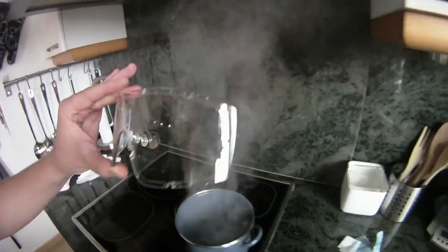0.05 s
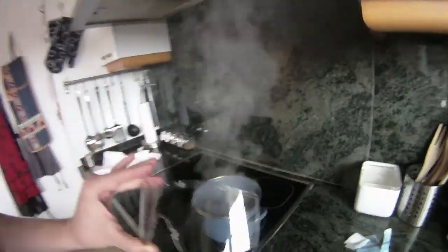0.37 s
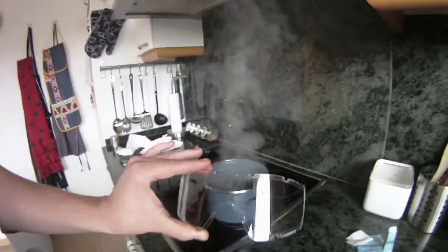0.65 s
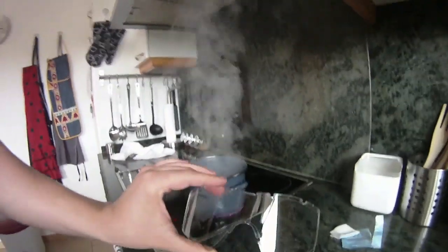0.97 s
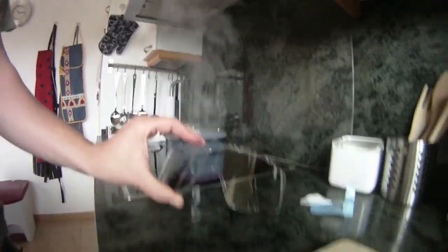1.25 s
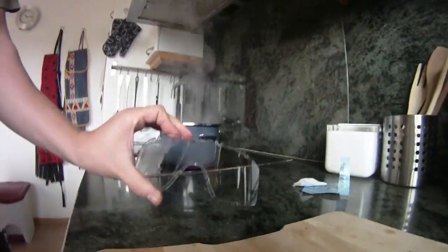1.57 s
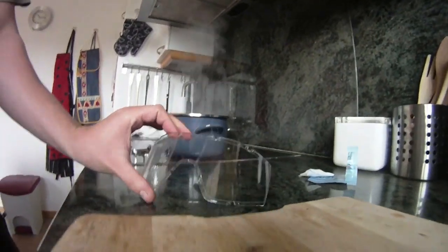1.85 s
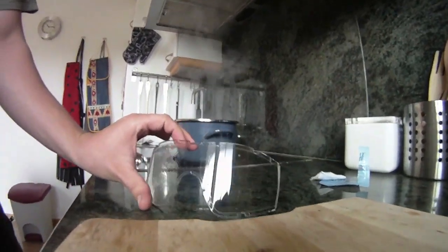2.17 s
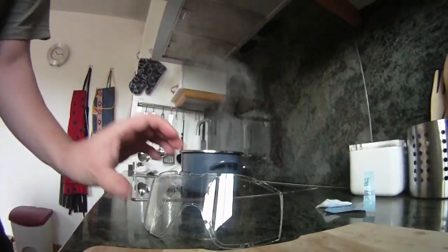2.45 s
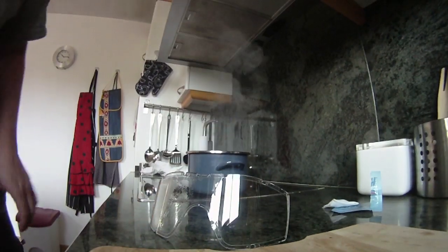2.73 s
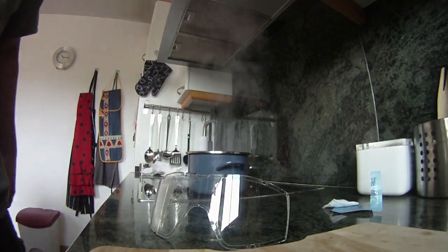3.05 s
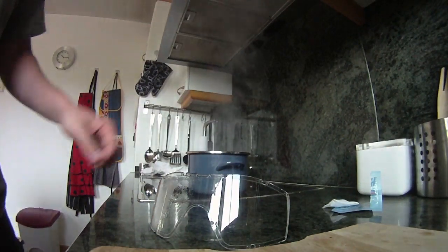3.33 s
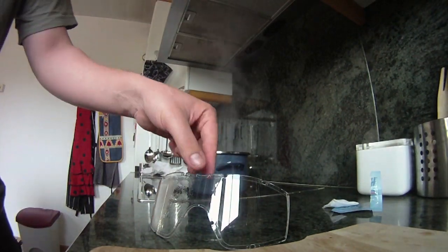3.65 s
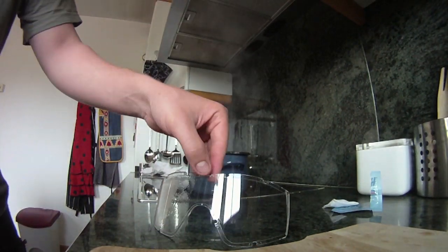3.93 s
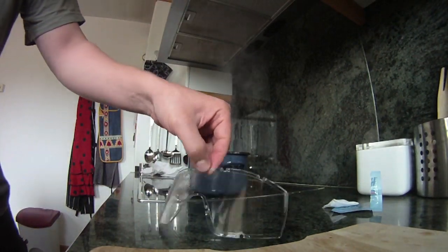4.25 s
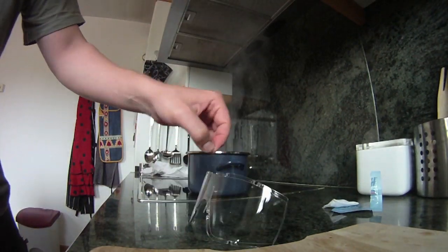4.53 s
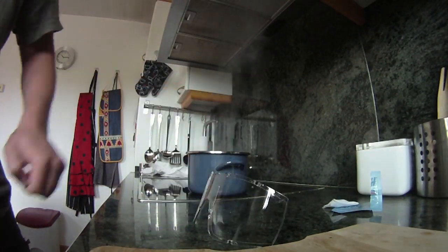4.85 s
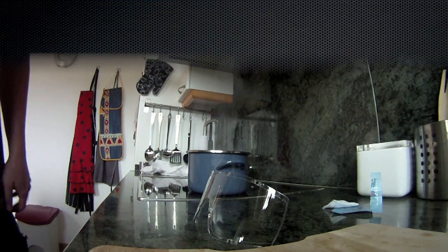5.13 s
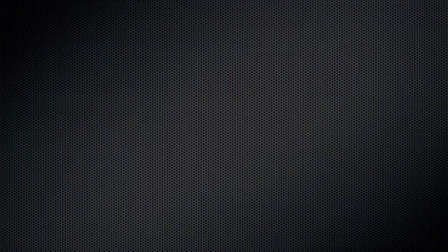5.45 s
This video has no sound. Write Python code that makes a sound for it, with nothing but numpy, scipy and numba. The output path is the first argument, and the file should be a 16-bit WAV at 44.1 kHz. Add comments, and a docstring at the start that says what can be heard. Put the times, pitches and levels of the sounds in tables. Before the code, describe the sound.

In a kitchen, a hob hums low and a steaming pot hisses faintly. The microphone clicks, knocks and scrapes as it is carried. Plastic safety goggles are set on a stone worktop with a ringing chatter, then the microphone lands with a loud, overloaded thump. Later the goggles tip over and chatter again. A few small knocks and a pop end it, all with a slightly glassy treble.

```python
"""A hob hums and a pot steams while a camera, carried close by, scrapes, clicks and knocks in its case.
The plastic shield of some safety goggles is set down on a stone worktop, where it rings and chatters.
The camera is put down with a thump that overloads its microphone; later the shield tips over and
chatters again. The camera samples the sound slowly, which adds a glassy treble."""
import sys
import numpy as np
from scipy import signal
from scipy.fft import rfft, irfft
from scipy.io import wavfile
from scipy.ndimage import uniform_filter1d
from numba import njit

SR = 44100
rng = np.random.default_rng(int(sys.argv[2]) if len(sys.argv) > 2 else 0)


def wav_record(signal):
    """Record a signal, one row per channel, as 16-bit PCM in the file named by sys.argv[1]."""
    frames = np.transpose(np.atleast_2d(signal))
    bounded = np.clip(frames, -1, 1)
    # unit amplitude maps onto the largest positive 16-bit level
    quanta = np.round(bounded * 32767).astype(np.int16)
    wavfile.write(sys.argv[1], SR, quanta)


N = 246519
T = np.arange(N) / SR

# the tone of the plastic case when it clicks or rubs: (frequency [Hz], level [dB])
CASE_COLOUR = [(150, -22), (400, -5), (900, 2.5), (1600, -3), (3000, 4), (4700, -4), (6000, -8.5)]


def undb(db):
    """Turn decibels into a gain to multiply by."""
    return 10 ** (np.asarray(db) / 20)


def unit(x):
    """Scale a sound to an average (rms) level of 1."""
    return x / np.sqrt(np.mean(x ** 2))


def unit_hit(x):
    """Scale a hit to the energy of 4 ms of sound at level 1."""
    return x / np.sqrt(np.sum(x ** 2) / (.004 * SR))


def fade(t60, size):
    """A gain, size samples long, that dies away by 60 dB every t60 seconds."""
    return np.exp(-np.log(1000) * T[:size] / t60)


def ping(hz, t60, size):
    """One pure note that dies away."""
    return fade(t60, size) * np.sin(2 * np.pi * hz * T[:size])


def tone(hz, db):
    """A lasting note that follows a changing pitch, at an average level of db."""
    phase = 2 * np.pi * np.cumsum(hz) / SR
    return np.sqrt(2) * undb(db) * np.sin(phase)


def add(out, s, x):
    """Mix x into out, starting at s seconds."""
    i = int(s * SR)
    out[i:i + len(x)] += x[:N - i]


def after(s, ramp_s=0.082):
    """Slide from 0 to 1 around s seconds."""
    return np.clip((T - s) / ramp_s + .5, 0, 1)


def swell(rows, range_db=25.5):
    """A gain that climbs range_db to each peak in its rise time and sinks as far in its fall time."""
    gain = np.zeros(N)
    for peak_s, db, rise_s, fall_s in rows:
        distance = np.maximum((peak_s - T) / rise_s, (T - peak_s) / fall_s)
        gain += undb(db - range_db * np.minimum(distance, 10))
    return gain


def colour(x, points, tilt_db=0, size=2048):
    """Shape the tone along (Hz, dB) points; tilt_db per octave makes it brighter or duller."""
    hz, db = np.transpose(points)
    point_octaves = np.log2(hz)
    octave = np.log2(np.maximum(np.arange(size // 2 + 1) * SR / size, 1))
    slope_db = tilt_db * (np.maximum(octave, point_octaves[0]) - point_octaves.mean())
    top_cut_db = -40 * np.clip(octave - point_octaves[-1], 0, 1)
    gain = undb(np.interp(octave, point_octaves, db) + slope_db + top_cut_db)
    # build the filter so that it rings only after a hit, never before
    cepstrum = irfft(np.log(gain))
    cepstrum[1:size // 2] *= 2
    cepstrum[size // 2 + 1:] = 0
    response = irfft(np.exp(rfft(cepstrum))) * np.hanning(2 * size)[size:]
    return signal.fftconvolve(x, response)[:len(x)]


def drift(rate):
    """A smooth random wander of about 1 either way, with rate new values a second."""
    hold = int(SR / rate)
    steps = np.repeat(rng.standard_normal(N // hold + 1), hold)
    return unit(uniform_filter1d(uniform_filter1d(steps, hold), hold)[:N])


def specks(rate, scatter_db):
    """Tiny random kicks of uneven size, about rate of them a second."""
    kicks = (rng.random(N) < rate / SR) * rng.choice([-1, 1], N)
    return unit(kicks * undb(scatter_db * rng.standard_normal(N)))


def room(x, echo_db, t60=0.42, build_s=0.0027, size=30000):
    """Hard kitchen walls throw back a wash of echoes within a few milliseconds."""
    tail = rng.standard_normal(size) * fade(t60, size) * (1 - np.exp(-T[:size] / build_s))
    tail /= np.sqrt(np.sum(tail ** 2))
    return x + undb(echo_db) * signal.fftconvolve(x, tail)[:N]


def drones():
    """Weak, wavering notes fill the kitchen; one more sounds only for about the first second."""
    # the lasting notes: (pitch [Hz], level [dB])
    notes = [(43, -57.5), (92, -44), (142, -50), (361, -62), (689, -62.5)]
    lasting = sum(tone(hz + 2.282 * drift(6), db + 1.5 * drift(4.9)) for hz, db in notes)
    early = tone(hz=320 + 3 * drift(13.3), db=-53.5) * (after(0.163) - after(1.1))
    return lasting + early


def steam():
    """A pot of water hisses: thousands of tiny pops a second blur together."""
    # the hiss, which drops as the pot is left behind: (time [s], level [dB])
    levels = [(0, -52), (1.95, -50), (2.7, -55.5), (5.3, -53)]
    # the tone of the hiss: (frequency [Hz], level [dB])
    hiss_colour = [(300, 6.5), (700, -6), (1300, 3), (2200, 2.5), (3000, 5), (4500, -8), (6000, 1)]
    hiss = unit(colour(specks(rate=7000, scatter_db=4.5), hiss_colour))
    return hiss * undb(np.interp(T, *np.transpose(levels)) + 0.3 * drift(3.3))


def rumble(hum_db, level_db=-39, follow_share=0.095):
    """The room rumbles, rising and falling a little with the hob's hum."""
    # deep noise with a faint hiss on top: (frequency [Hz], level [dB])
    rumble_colour = [(20, -13), (45, 5), (70, -6.5), (105, -4.5), (145, 0.5), (180, -13), (230, -18.5),
                     (320, -17), (460, -15), (690, -12.5), (1000, -29.5), (2800, -40), (6000, -46.5)]
    noise = unit(colour(rng.standard_normal(N), rumble_colour, size=16384))
    return noise * undb(level_db + follow_share * (hum_db - hum_db.mean()))


def worktop():
    """The worktop booms softly under the hands."""
    # each boom: (peak time [s], level [dB], rise [s], fall [s])
    booms = [(2.06, -29, 0.21, 0.28), (4.15, -33, 0.25, 0.62), (5.09, -35.5, 0.23, 0.58)]
    # the worktop's deep tone: (frequency [Hz], level [dB])
    boom_colour = [(20, -24), (40, 6.5), (70, 1.5), (110, -16.5), (300, -27.5), (1000, -74.5)]
    return unit(colour(rng.standard_normal(N), boom_colour, size=16384)) * swell(booms)


def kitchen(hum_hz=121.2, rise_hz_per_s=.38, waver_db=1.8, hush_s=5.39, hush_db=-7):
    """The hob hums among the other background sounds; all of them sink just before the end."""
    # the hob's hum: (time [s], level [dB])
    hum_levels = [(0, -59), (.6, -42.5), (1.6, -35.5), (2.6, -37), (3.7, -34), (4.4, -37), (5.3, -41.5)]
    hum_db = np.interp(T, *np.transpose(hum_levels))
    hum = tone(hum_hz + rise_hz_per_s * T, hum_db + waver_db * drift(10))
    background = hum + drones() + steam() + rumble(hum_db) + worktop()
    return background * undb(hush_db * after(hush_s))


def crackle(start_s=1.38, end_s=1.66, level_db=-55.5):
    """A few dry ticks, then a thin, high crackle while the shield is carried."""
    # the single ticks: (time [s], level [dB])
    ticks = [(1.0216, -47), (1.2782, -47), (1.322, -47), (1.3393, -45), (1.356, -49)]
    tick = ping(hz=4750, t60=.004, size=512)
    out = unit(signal.fftconvolve(specks(rate=890, scatter_db=1.5), tick)[:N])
    out *= undb(level_db) * (after(start_s) - after(end_s))
    for s, db in ticks:
        add(out, s, undb(db) * unit_hit(tick))
    return out


def case_scrapes():
    """The camera case scrapes: many tiny slips follow each other too fast to tell apart."""
    # rubs on fingers and stone: (peak time [s], level [dB], rise [s], fall [s])
    rubs = [(.165, -27.5, 0.031, 0.019), (.78, -47.5, 0.47, .1), (.905, -34, 0.016, 0.0076),
            (1.086, -40.5, 0.062, 0.011), (1.22, -39, 0.14, 0.0099), (2.5, -33, 0.0034, 0.045),
            (2.544, -20.5, 0.029, 0.017), (5.045, -35.5, .018, 0.11), (5.18, -42.5, 0.12, 0.058)]
    # light scuffs as the hand leaves: (peak time [s], level [dB], rise [s], fall [s])
    scuffs = [(2.763, -29.5, .002, 0.011), (2.792, -33, 0.027, 0.036), (2.83, -43.5, 0.065, 0.17)]
    # the bright tone of a scuff: (frequency [Hz], level [dB])
    scuff_colour = [(500, 0), (1800, -4), (3400, 8.5), (4800, 7), (6000, 3)]
    rub = unit(colour(specks(rate=1700, scatter_db=2.5), CASE_COLOUR))
    scuff = unit(colour(specks(rate=8300, scatter_db=5.5), scuff_colour))
    return rub * swell(rubs) + scuff * swell(scuffs)


def case_clicks(t60=0.017, ring_db=-5, size=4096):
    """The plastic case snaps in its joints: a short crack of noise with a note of its own."""
    # each snap: (time [s], level [dB], brightness [dB per octave], pitch [Hz])
    snaps = [(0.158, -23, -3.5, 1050), (0.4596, -13, -2, 4570), (0.9052, -28, -5, 2860),
             (0.9861, -18.5, -1.5, 2280), (1.0872, -14.5, 5, 3920), (1.103, -25, -5, 3540),
             (1.4026, -25, 4.5, 2840), (2.4205, -1, -5.5, 1655), (2.497, -24.5, -6, 1130),
             (2.5446, -11.5, -1.5, 2620), (5.03, -35, 2.5, 2470), (5.0771, -17.5, -0.5, 1046),
             (5.2838, -36.5, -5, 1160), (5.33, -31, -8, 1120), (5.3447, -29, -5, 2260),
             (5.3774, -37, -8, 2560)]
    out = np.zeros(N)
    for s, db, tilt_db, hz in snaps:
        burst = rng.standard_normal(size) * fade(t60, size)
        crack = unit_hit(colour(burst, CASE_COLOUR, tilt_db))
        ring = unit_hit(ping(hz, t60, size))
        add(out, s, undb(db) * unit_hit(crack + undb(ring_db) * ring))
    return out


def case_knocks(thud_cycles=0.52, wall_rise_s=0.0015, resting_from_s=3, size=6000):
    """A fingertip or the stone bumps the case: a few heavy swings, then its wall rings on."""
    # each bump: (time [s], strength [dB], thud pitch [Hz], gain of the wall's ring [dB])
    bumps = [(0.4602, -7.5, 755, -15.5), (0.904, -28.5, 617, -18), (1.0875, -8.5, 812, -25),
             (1.4035, -15.5, 780, -15.5), (1.877, -37.5, 590, -22), (2.012, -32.5, 636, 4),
             (2.122, -22.5, 610, -7), (2.219, -27.5, 597, -3), (2.374, -25, 950, -7), (2.42, 17, 545, -60),
             (2.4965, -25.5, 623, -4), (2.545, -30, 600, -7), (4.335, -13.5, 720, 1.5),
             (5.171, -21.5, 525, -2.5), (5.183, -19, 199, -44), (5.214, -40, 616, 0),
             (5.328, -28.5, 567, 2)]
    # how the hollow case boosts or weakens the bumps: (frequency [Hz], gain [dB])
    hollow_colour = [(100, -8.5), (320, -13.5), (470, 1.5), (680, 3), (830, -8), (1000, 5.5), (1250, 1),
                     (1450, -31), (2000, -3)]
    held, resting = (592, 0.1), (655, 0.065)  # the wall, in the hand and free: (pitch [Hz], ring [s])
    out, t = np.zeros(N), T[:size]
    for s, db, hz, ring_db in bumps:
        wall_hz, wall_t60 = held if s < resting_from_s else resting
        thud_shape = t ** 3 * np.exp(-np.sqrt(2) * hz * t / thud_cycles)
        thud = unit_hit(thud_shape * np.sin(2 * np.pi * hz * t))
        wall = 2 * (1 - np.exp(-t / wall_rise_s)) * ping(wall_hz, wall_t60, size)
        add(out, s, undb(db) * (thud + undb(ring_db) * wall))
    return colour(out, hollow_colour)


def shield_ring(ring_t60, blur_t60, blur_db, tilt_db, size=12000):
    """The shield hits stone and rings with many notes; each spot on the rim mixes them differently."""
    # the shield's clear notes: (pitch [Hz], relative level [dB])
    notes = [(500.6, -39), (683.7, -42), (909.8, -47), (1195, -39.5), (1626, -50), (1857, -46), (2011, -43),
             (2155, -36.5), (2261, -38), (2406, -40), (2552, -44), (2589, -40), (2869, -45), (3149, -50),
             (3219, -50), (3747, -43), (3854, -40), (3946, -37.5)]
    # its crowded notes, which blur into noise: (frequency [Hz], relative level [dB])
    blur_colour = [(100, -32), (320, -5), (480, 1.5), (700, 7), (940, -2.5), (1170, 1), (1450, -4),
                   (1700, -2.5), (2150, -3.5), (2900, 0.5), (3400, -5.5), (3950, -3), (4250, -18.5),
                   (5000, -11.5)]
    hz, db = np.transpose(notes)[:, :, None]
    gains = undb(db + tilt_db * np.log2(hz) + 2 * rng.standard_normal(hz.shape))
    waves = np.sin(2 * np.pi * (hz * T[:size] + rng.random(hz.shape)))
    clear = (gains * waves).sum(0) * fade(ring_t60, size)
    blur = colour(rng.standard_normal(size) * fade(blur_t60, size), blur_colour)
    return unit_hit(unit_hit(clear) + undb(blur_db) * unit_hit(blur))


def shield_taps(boost_db=3):
    """Hard taps on the stone make the whole shield ring; soft fingertips wake just one note."""
    # taps on the stone: (time [s], level before the boost [dB], brightness [dB per octave])
    taps = [(1.671, -19, 3), (1.991, -26, 9), (2.007, -18, -8.5), (2.1238, -18, -12.5), (2.134, -18.5, -25),
            (2.214, -17.5, 1), (2.25, -20.5, -10), (2.3721, -23.5, 7), (3.999, -39, -9), (4.187, -28, -5),
            (4.3223, -20, 0.5), (4.3346, -9, 3.5), (4.355, -20, 15.5), (4.4008, -15, 9), (4.432, -13.5, -1),
            (4.486, -18, 3.5)]
    # fingertip touches: (time [s], level [dB])
    touches = [(3.748, -47), (3.853, -39.5), (3.999, -44.5), (4.034, -30), (4.188, -36)]
    out = np.zeros(N)
    for s, db, tilt_db in taps:
        ring = shield_ring(ring_t60=0.087, blur_t60=0.035, blur_db=0, tilt_db=tilt_db)
        add(out, s, undb(db + boost_db) * ring)
    for s, db in touches:
        add(out, s, undb(db) * unit_hit(ping(hz=1190, t60=0.068, size=8000)))
    return out


def shield_chatter(rim_spots=4, settle_db=20.5):
    """The shield bounces at random on several spots of its rim, and the bounces shrink as it settles."""
    # each spell of chatter: (start [s], time to sink by settle_db [s], starting level [dB])
    spells = [(1.989, 0.064, -26), (2.067, 0.26, -37.5), (2.121, 0.25, -19.5), (2.389, 0.031, -35),
              (4.0, 0.051, -41.5), (4.328, 0.28, -18.5)]
    force, out = np.zeros(N), np.zeros(N)
    for s, length, db in spells:
        progress = np.clip((T - s) / length, 0, 2)
        force += (T >= s) * undb(db - settle_db * progress ** 2)
    for _ in range(rim_spots):
        ring = shield_ring(ring_t60=.17, blur_t60=0.051, blur_db=-0.5, tilt_db=-0.9)
        ring /= np.sqrt(rim_spots * np.sum(ring ** 2))
        bounces = force * specks(rate=80, scatter_db=1.5)
        out += signal.fftconvolve(bounces, ring)[:N]
    return out


def scene():
    """One microphone hears it all: the shield with the room's echo, the close case with almost none."""
    shield = room(shield_taps() + shield_chatter(), echo_db=-8.5)
    case = room(case_knocks() + case_clicks(), echo_db=-36.5)
    mono = shield + case + case_scrapes() + crackle() + kitchen()
    return np.array([mono, mono])


@njit
def follow(x, attack_s, release_s):
    """Track a level, rising at the pace of attack_s and sinking at that of release_s."""
    out, level = np.empty(len(x)), 0.
    for i in range(len(x)):
        lag_s = attack_s if x[i] > level else release_s
        level += (x[i] - level) / (lag_s * SR)
        out[i] = level
    return out


def slow_sampling(x, top_hz=15300):
    """Samples taken at 12 kHz are held as steps, which gives every note faint, glassy copies high up."""
    slow = signal.resample_poly(x, 40, 147)  # 12 kHz
    steps = np.repeat(slow, 4)  # 48 kHz
    glassy = signal.resample_poly(steps, 147, 160)[:N]  # back to SR
    treble_cut = signal.ellip(12, .1, 70, top_hz, fs=SR, output="sos")
    return signal.sosfilt(treble_cut, glassy)


def record(dry, threshold_db=-8, clip_level=.84, stop_s=5.4772, pop_db=-16, pop_s=0.0014):
    """The camera turns loud moments down, clips what is still too loud and switches off with a pop."""
    # the microphone's fading treble: (frequency [Hz], gain [dB])
    microphone = [(4000, -1.5), (4300, -2.5), (5100, -5), (5600, -9.5), (6000, -14), (6500, -43)]
    x = colour(dry[0], microphone)
    level = follow(np.abs(x), attack_s=0.0031, release_s=0.052)
    x = x / np.maximum(1, level / undb(threshold_db))
    x = np.clip(x, -clip_level, clip_level)
    pop_then_silence = -undb(pop_db) * (T < stop_s + pop_s)
    x = np.where(T < stop_s, x, pop_then_silence)
    x = slow_sampling(x)
    return np.array([x, x])


dry = scene()
out = record(dry)
wav_record(out)
```